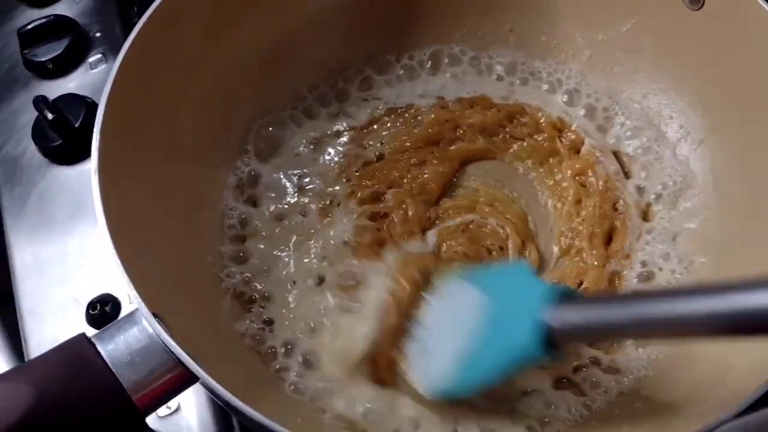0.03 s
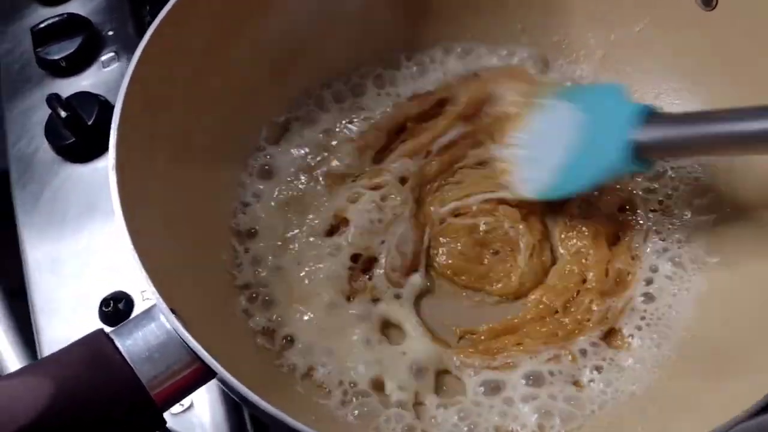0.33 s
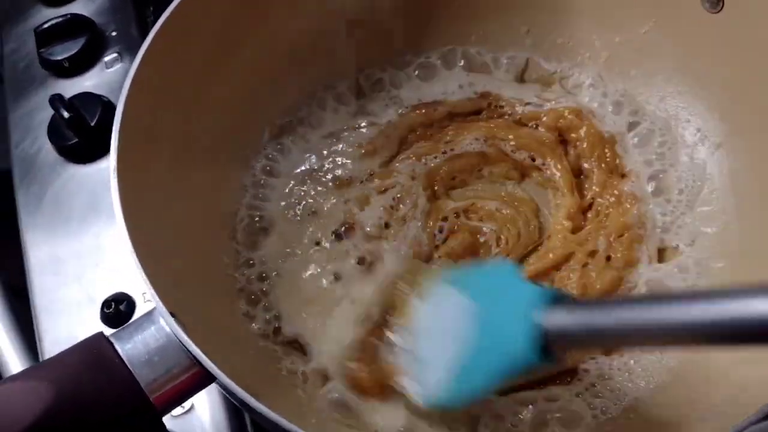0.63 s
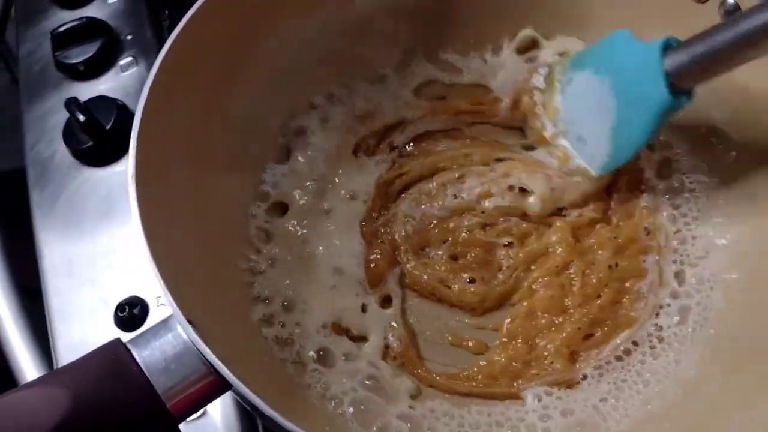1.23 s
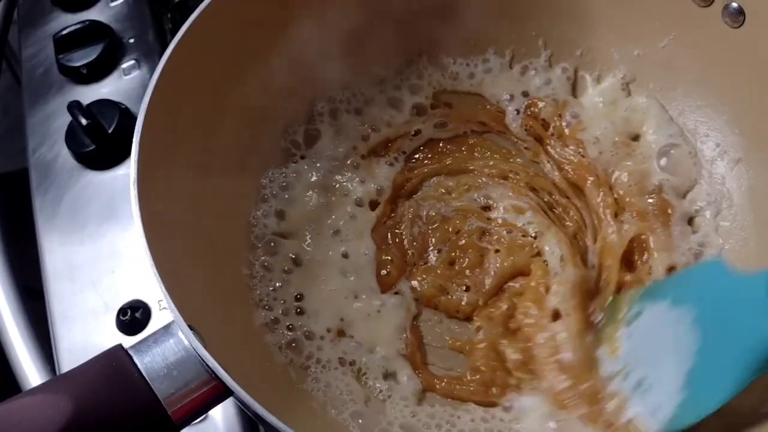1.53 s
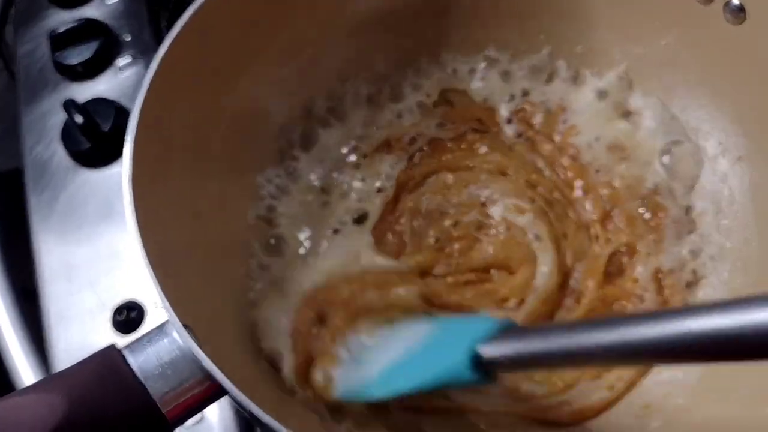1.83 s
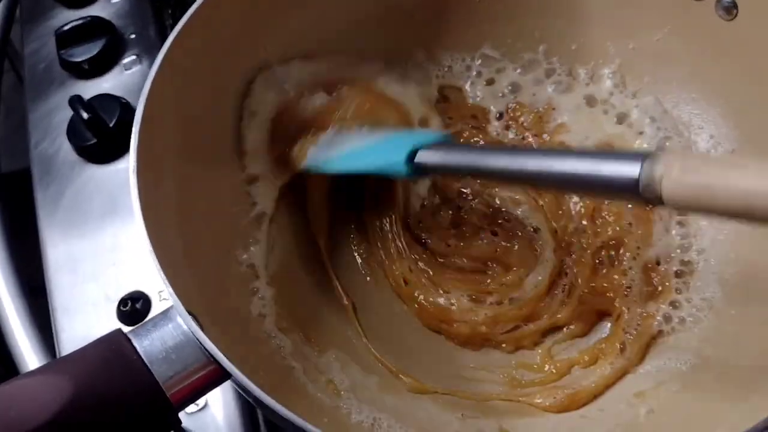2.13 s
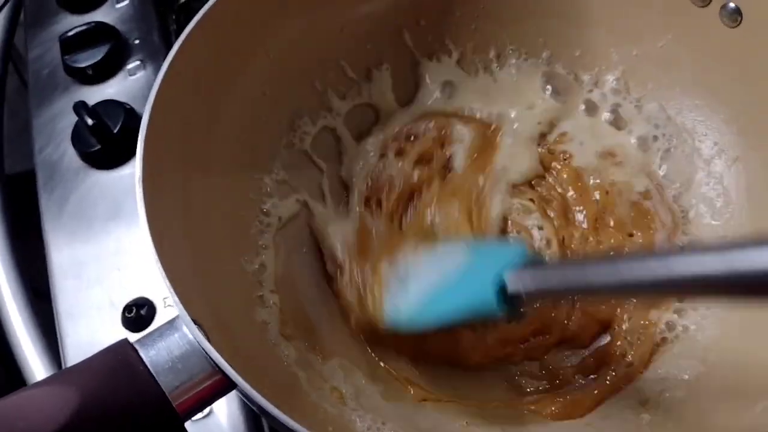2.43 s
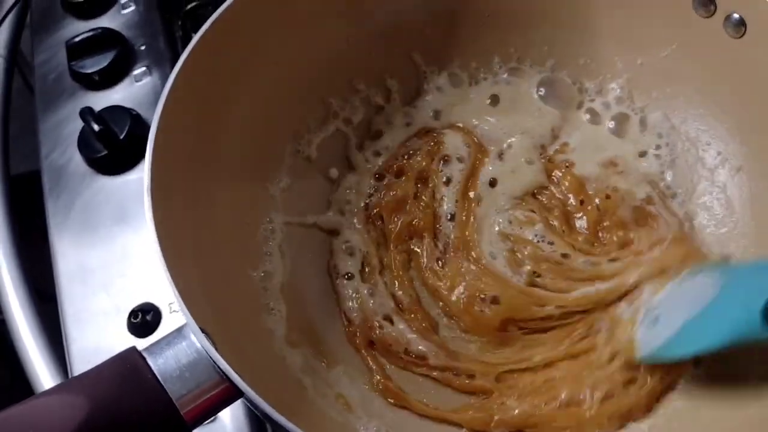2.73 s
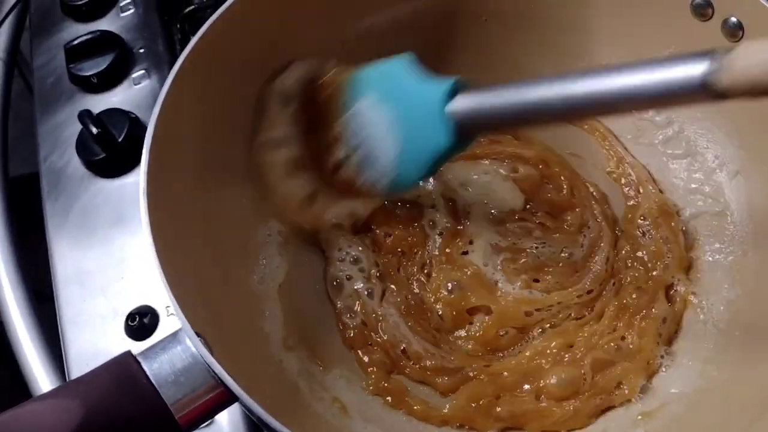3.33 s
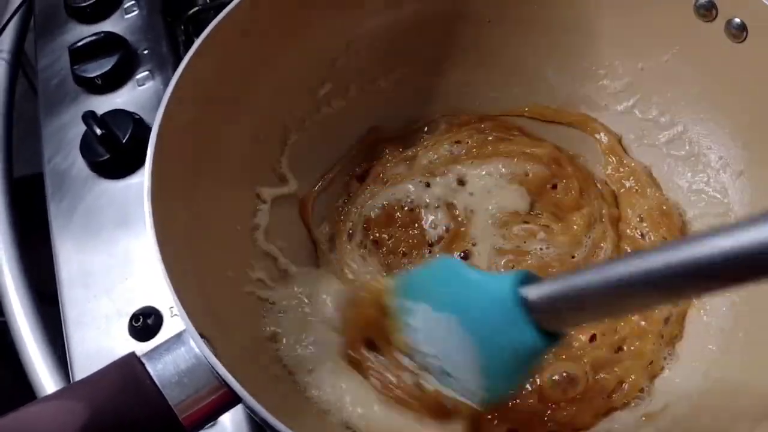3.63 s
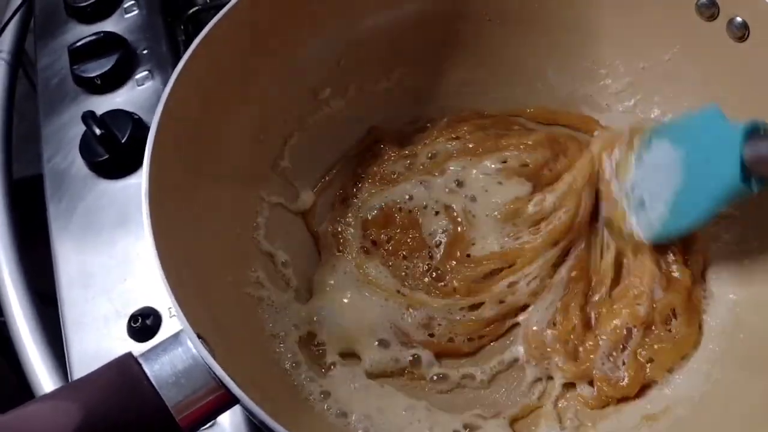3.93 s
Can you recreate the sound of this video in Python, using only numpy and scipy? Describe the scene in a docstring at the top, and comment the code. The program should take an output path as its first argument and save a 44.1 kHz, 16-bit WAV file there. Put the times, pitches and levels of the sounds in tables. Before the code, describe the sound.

Caramel and cream sizzle and bubble in a pot, flaring up with each stir.

```python
"""Caramel boiling on a gas stove

Caramel and cream boil in a pot, close up in a kitchen. Each sweep of a soft spatula pushes wet cream
onto bare hot metal, where it flares into a bright sizzle of tiny bursts and dies back to a simmer.
Larger foam bubbles pop in the hollow of the pot, a drop spits now and then, and the stove rumbles
and hums below."""
import sys
import numpy as np
from scipy import signal
from scipy.fft import rfft, irfft
from scipy.io import wavfile

SR = 44100
rng = np.random.default_rng(int(sys.argv[2]) if len(sys.argv) > 2 else 0)


def digitize_waveform(pressure):
    """Quantize a signal to 16-bit integers and store it at the path in sys.argv[1].

    Rows of a 2-D input are taken as channels; values are limited to [-1, 1].
    """
    field = np.atleast_2d(pressure).T
    bounded = np.clip(field, -1, 1)
    quanta = np.round(bounded * 32767).astype(np.int16)
    wavfile.write(sys.argv[1], SR, quanta)


N = 176400

# Tone of cream on hot metal, for sizzle and spits: freq_hz, level_db
SIZZLE_SPECTRUM = [(1800, -20.5), (3600, -5.5), (4650, -6.5), (5400, -5.5), (6200, -3), (7050, 0.5),
                   (8000, 1), (9000, 1), (10000, -1), (11500, -0.5), (15500, -3.5)]


def from_db(db):
    return 10 ** (np.asarray(db) / 20)


def unit_rms(x):
    return x / np.sqrt(np.mean(x ** 2) + 1e-20)


def seconds():
    return np.arange(N) / SR


def bin_hz():
    return np.maximum(np.fft.rfftfreq(N, 1 / SR), 1)


def filtered(x, gain):
    return irfft(rfft(x) * gain, N)


def over_time(points):
    """An automation curve, read at every sample."""
    return np.interp(seconds(), *np.transpose(points))


def over_frequency(points):
    """A curve over log frequency, read at every bin."""
    hz, value = np.transpose(points)
    return np.interp(np.log(bin_hz()), np.log(hz), value)


def colour(points):
    """EQ gain from a spectrum table, rolling off steeply beyond its ends."""
    low_cut = np.hypot(1, (points[0][0] / bin_hz() / 2) ** 2)
    high_cut = np.hypot(1, (bin_hz() / points[-1][0] / 2) ** 4)
    return from_db(over_frequency(points)) / low_cut / high_cut


def drift(rate_hz):
    """A smooth random wobble of unit RMS."""
    return unit_rms(filtered(rng.standard_normal(N), 1 / (1 + (bin_hz() / rate_hz) ** 2)))


def bursts(per_s, spread_db):
    """Random clicks, mostly small; each side hears every one with its own strength and sign."""
    born = rng.random(N) < per_s / SR
    size = from_db(spread_db * np.minimum(rng.exponential(1, N), 5))
    return unit_rms(born * size * rng.standard_normal((2, N)))


def stereo_blend(pair):
    """Crossfeed two unrelated signals: narrow in the bass, wide in the treble."""
    # How alike the two sides are: freq_hz, correlation
    likeness = [(60, 0.42), (130, .85), (500, 0.83), (1000, 0.46), (1450, 0.21), (2100, 0.58),
                (3500, 0.083), (7000, 0.05), (15000, 0.1)]
    angle = np.arcsin(np.clip(over_frequency(likeness), 0, 1)) / 2
    return filtered(pair, np.cos(angle)) + filtered(pair[::-1], np.sin(angle))


def stove():
    """The bed: gas flame and room rumble under a wavering hum."""
    # Tone of the rumble: freq_hz, level_db
    rumble_spectrum = [(20, -0.5), (33, 0), (50, -7.5), (80, -11.5), (120, -9.5), (175, -24), (210, -14),
                       (300, -22.5), (400, -18)]
    # Its slow swell: time_s, level_db
    rumble_swell = [(0, 0), (.45, 0), (.9, 3.5), (1.2, 1.5), (1.7, -1), (2.3, 0.5), (3.0, -1), (3.8, 3),
                    (4, -0.5)]
    rumble_db, hum_db = -56.5, -65.5
    hum_hz, hum_width_hz = 137.7, 6.7
    rumble = unit_rms(filtered(stereo_blend(rng.standard_normal((2, N))), colour(rumble_spectrum)))
    hum_peak = 1 / (1 + (2 * (bin_hz() - hum_hz) / hum_width_hz) ** 2)
    hum = unit_rms(filtered(rng.standard_normal(N), hum_peak))
    return from_db(rumble_db + over_time(rumble_swell)) * rumble + from_db(hum_db) * hum


def pot_resonance():
    """EQ gain of the hollow pot, which lifts its own resonances."""
    # Modes of the air in the pot: pitch_hz, width_hz, lift_db
    air_modes = [(472, 25, 4.5), (576, 28, 7.5), (671, 19, 8), (755, 18, 9), (868, 8.1, 7), (1122, 34, 7.5),
                 (1280, 46, 1), (2062, 107, 4), (3120, 49, 0)]
    return from_db(sum(db / (1 + (2 * (bin_hz() - hz) / width) ** 2) for hz, width, db in air_modes))


def bubbles(spectrum, per_s, ring_cycles, spread_db, sizes=20):
    """Bubbles of many sizes, each ringing for a few cycles, heard through the pot."""
    clicks = bursts(per_s, spread_db)
    size_of_click = rng.integers(0, sizes, N)
    rings = 0
    for size, hz in enumerate(np.geomspace(spectrum[0][0], spectrum[-1][0], sizes)):
        decay = from_db(-60 * hz / (ring_cycles * SR))
        feedback = [1, -2 * decay * np.cos(2 * np.pi * hz / SR), decay * decay]
        kicks = clicks * (size_of_click == size) + 1e-18
        rings = rings + signal.lfilter([1 - decay, 0, decay - 1], feedback, kicks)
    return unit_rms(filtered(stereo_blend(rings), colour(spectrum) * pot_resonance()))


def foam():
    """Small pops on the surface and deeper bubbling in the syrup."""
    # Tone of each layer: freq_hz, level_db
    pop_spectrum = [(700, -18), (1200, -10.5), (1700, -2.5), (2100, -2), (2500, -1), (3300, 0), (4000, -2),
                    (4700, -8.5), (6000, -14.5), (9000, -5)]
    deep_spectrum = [(100, -11), (250, -7.5), (450, -4), (650, -5.5), (900, -6), (1200, -2.5), (1700, -8),
                     (3000, -15)]
    # Fader ride of each layer, before its trim: time_s, level_db
    pop_ride = [(0.0, -44), (0.27, -45.5), (0.32, -41.5), (0.73, -40), (0.82, -43), (1.53, -44),
                (1.7, -43.5), (2.14, -47), (2.46, -40), (2.72, -41), (3.09, -43), (3.15, -39), (3.2, -43.5),
                (3.35, -41), (3.44, -46.5), (3.55, -40), (3.78, -43.5), (4.0, -40)]
    deep_ride = [(0.0, -51), (0.01, -50), (0.27, -52.5), (0.47, -48), (0.62, -52.5), (1.14, -51.5),
                 (2.02, -53.5), (2.03, -57), (2.48, -45.5), (2.88, -53.5), (3.65, -48), (3.73, -55.5),
                 (3.84, -46.5), (4.0, -50.5)]
    pop_trim_db, deep_trim_db = 3.5, 0.5
    pops = bubbles(pop_spectrum, per_s=30000, ring_cycles=9, spread_db=0.9)
    deep = bubbles(deep_spectrum, per_s=7000, ring_cycles=6.2, spread_db=0.64)
    pops *= from_db(pop_trim_db + over_time(pop_ride))
    deep *= from_db(deep_trim_db + over_time(deep_ride))
    return pops + deep


def spits():
    """Drops burst, each with a very short, bright crack."""
    # Spitting drops: start_s, level_db
    drops = [(1.7845, -19.5), (1.8205, -20), (1.8912, -15), (1.9476, -24), (2.3137, -25), (2.326, -18)]
    t, decay_s = seconds(), 0.00092
    envelope = sum(from_db(db) * (t >= start) * np.exp(-np.maximum(t - start, 0) / decay_s)
                   for start, db in drops)
    return envelope * unit_rms(filtered(rng.standard_normal((2, N)), colour(SIZZLE_SPECTRUM)))


def near_reflections():
    """Comb-filter gain of the direct sound plus its close echoes."""
    # Bounces off pot wall, hob and kitchen wall: delay_s, level_db
    echoes = [(.0015, -30), (.0037, -22), (.0083, -18), (0.0145, -22)]
    return 1 + sum(from_db(db) * np.exp(-2j * np.pi * bin_hz() * delay) for delay, db in echoes)


def pitch_focus(hz, centre_hz, half_width_oct):
    """A bell curve that gathers the sizzle round one pitch."""
    return 1 / (1 + (np.log2(hz / centre_hz) / half_width_oct) ** 2)


def sizzle():
    """Tiny bursts and steam: each flare swells, holds and fades in its own range, over a simmer."""
    # Cream meets hot metal:
    # start_s, rise_s, hold_s, fade_db_per_s, level_db, centre_hz, half_width_oct, pan_left_db
    flares = [(0.018, 0.0073, 0.009, 250, -29, 7800, 1.1, -1.5), (0.07, 0.01, .020, 60, -35, 9000, 0.91, 5),
              (0.259, 0.013, .032, 508, -20.5, 10200, 0.38, 5),
              (0.261, 0.024, .095, 70, -20, 10200, 0.69, 1.5),
              (0.398, 0.0071, 0.0096, 450, -16.5, 10400, .6, 3),
              (0.439, .008, 0.047, 250, -23, 9100, .8, 2.5), (0.54, 0.007, 0.04, 93, -21, 9500, 0.73, -0.5),
              (0.662, 0.0048, 0.0096, 450, -23.5, 8900, 1.4, 0.5),
              (0.707, .006, .080, 33, -28, 8000, 0.84, -3.5),
              (0.796, 0.15, 0.042, 25, -21.5, 11000, 0.8, 2.5),
              (1.236, 0.055, .020, 18, -25.5, 11400, 0.92, -1.5),
              (1.552, 0.038, 0.021, 54, -26.5, 8640, 2.3, 2),
              (1.703, .025, .015, 160, -26.5, 5300, 0.28, 8), (1.76, .012, .018, 300, -26, 9900, 0.63, 2.5),
              (1.805, .012, .008, 401, -25.5, 12900, .15, -5), (1.930, .240, .020, 73, -30, 12000, 0.86, 4),
              (2.188, 0.011, 0.046, 60, -22, 11300, 0.59, 3.5),
              (2.235, .016, 0.099, 46, -16, 12500, 0.82, -0.5),
              (2.326, 0.1, 0.032, 21, -18, 10200, 1.3, -2), (2.701, 0.044, .028, 18, -28, 13200, 0.41, 1),
              (3.105, .019, .018, 54, -24, 7600, 0.36, 4.5),
              (3.202, 0.028, 0.048, 40, -23.5, 8400, 0.54, 2.5),
              (3.433, 0.12, 0.11, 52, -15.5, 11800, 0.85, -2.5),
              (3.694, 0.18, .170, 20, -25.5, 8800, 0.71, 0.5)]
    steam_db, simmer_db = 5.5, -30  # steam is relative to the bursts
    flicker_db, flutter_db = 1.32, 0.5  # each band alone; the whole sizzle
    t, bands_hz = seconds(), np.geomspace(4200, 15500, 13)
    start, rise, hold, fade, db, centre_hz, half_width_oct, pan_db = np.transpose(flares)[:, :, None]
    attack = np.clip((t - start) / rise, 0, 1)
    release_db = abs(fade) * np.maximum(t - start - rise - hold, 0)
    swell_power = (attack * from_db(db - release_db)) ** 2
    pan_power = from_db(np.hstack([pan_db, -pan_db]))
    fry = bursts(per_s=9800, spread_db=2) + from_db(steam_db) * rng.standard_normal((2, N))
    fry = filtered(stereo_blend(fry), colour(SIZZLE_SPECTRUM) * near_reflections())
    fry_spectrum = rfft(unit_rms(fry))
    mix = 0
    for hz, solo in zip(bands_hz, np.eye(len(bands_hz))):
        flare_power = (pan_power * pitch_focus(hz, centre_hz, half_width_oct) ** 2).T @ swell_power
        simmer = from_db(simmer_db) * pitch_focus(hz, centre_hz=8900, half_width_oct=0.75)
        band = irfft(fry_spectrum * over_frequency(np.c_[bands_hz, solo]), N)
        flicker = from_db(flicker_db * drift(rate_hz=28))
        mix = mix + np.sqrt(flare_power + simmer ** 2) * band * flicker
    return mix * from_db(flutter_db * drift(rate_hz=66))


def scene():
    return sizzle() + spits() + foam() + stove()


def record(dry):
    """The left microphone faces the pot; the right one is shaded and a little late. The top is cut."""
    # Tilt towards the left microphone: freq_hz, left_minus_right_db
    balance = [(60, 1), (140, -1.3), (300, 1), (500, 2.7), (850, 3.5), (1100, 5.5), (1450, 7), (2000, 10),
               (3300, 10.5), (4000, 8), (4700, 4), (5400, 6), (6200, 7.5), (7000, 13.5), (8000, 13),
               (9000, 12.5), (10000, 8.5), (11100, 9.5), (12300, 14), (15000, 13.5)]
    right_lag_s, cutoff_hz = 0.00007, 15950
    left = from_db(over_frequency(balance))
    right = np.exp(-2j * np.pi * bin_hz() * right_lag_s)
    microphones = np.array([left, right]) * np.sqrt(2 / (1 + left ** 2))  # constant total power
    low_pass = 1 / np.hypot(1, (bin_hz() / cutoff_hz) ** 300)
    return filtered(dry, microphones * low_pass)


dry = scene()
out = record(dry)
digitize_waveform(out)
```